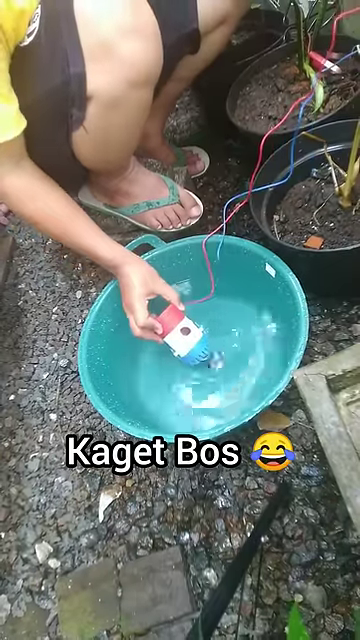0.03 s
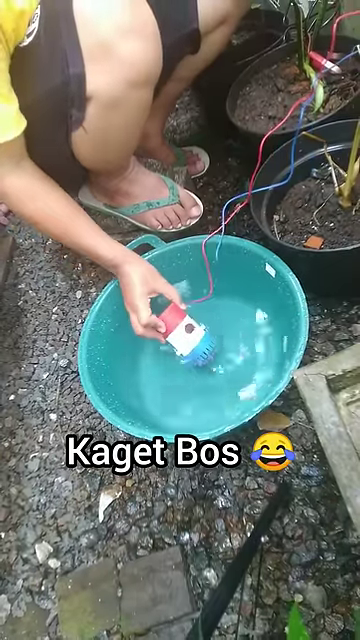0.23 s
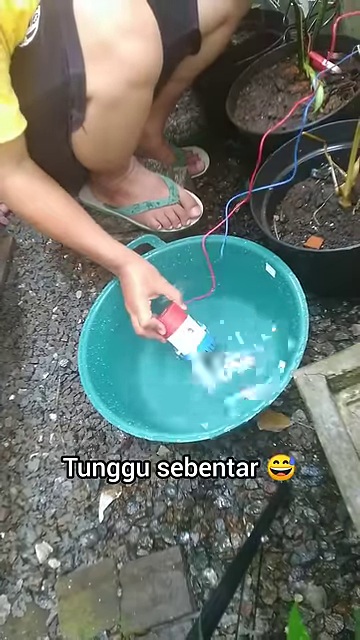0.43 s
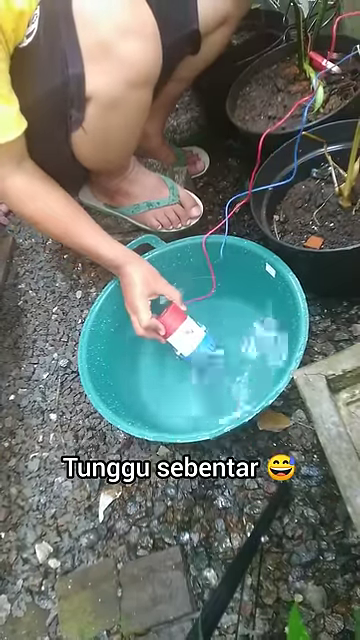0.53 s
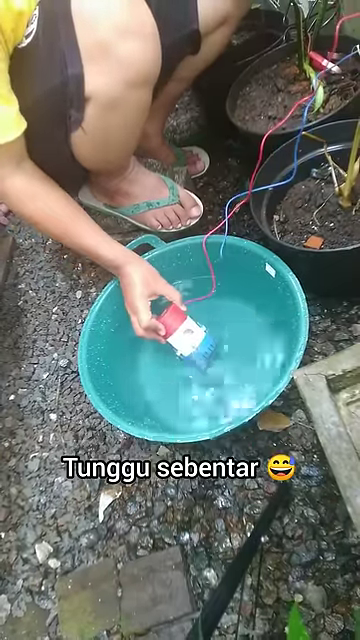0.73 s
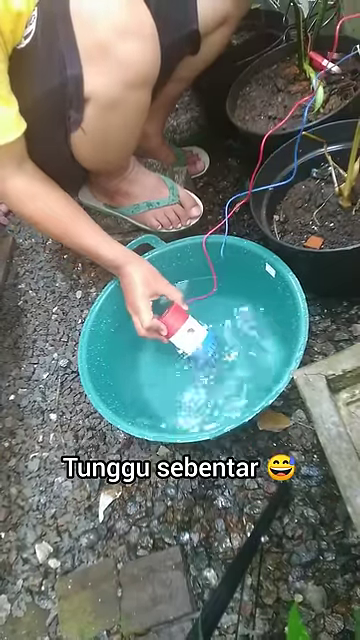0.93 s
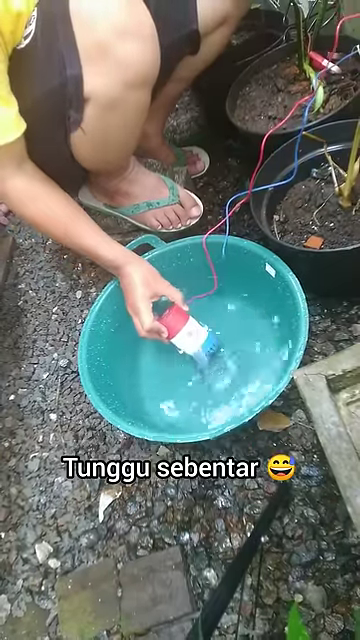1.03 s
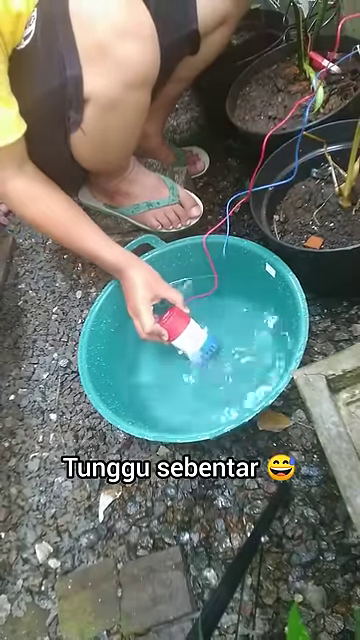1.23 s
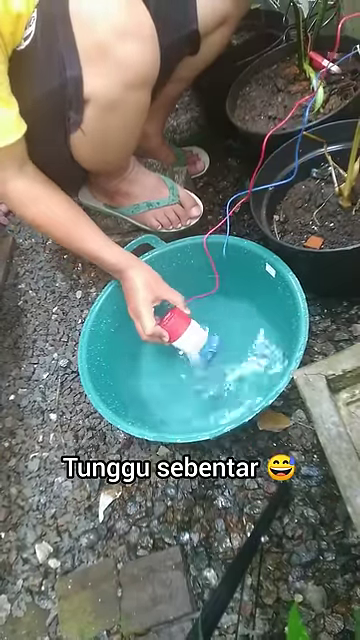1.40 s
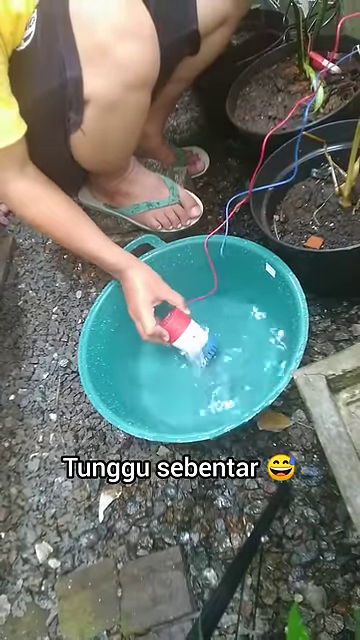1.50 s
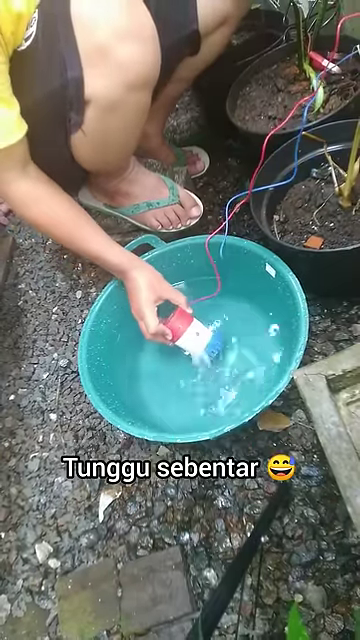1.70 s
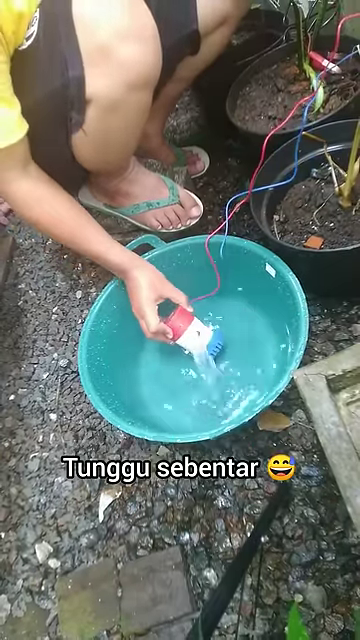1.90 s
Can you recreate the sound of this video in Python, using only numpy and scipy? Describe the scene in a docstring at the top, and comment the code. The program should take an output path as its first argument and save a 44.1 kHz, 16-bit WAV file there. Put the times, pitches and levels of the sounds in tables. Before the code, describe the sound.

Small electric pump starts with a splash, then hums and whirs in bubbling water outdoors.

```python
"""A low distant rumble and outdoor air are heard first, then a faint high tick. A small electric pump, held
in a plastic basin of water, kicks in with a loud jolt that flings water and makes the basin boom.
It runs at about 185 turns a second: harmonics of the rotation give a hum and a bright whir, while
resonating bubbles give churning and single pops. It falters briefly, catches again with a smaller jolt
and runs on."""
import sys
import numpy as np
from scipy import signal
from scipy.fft import rfft, irfft
from scipy.io import wavfile

SR = 44100
rng = np.random.default_rng(int(sys.argv[2]) if len(sys.argv) > 2 else 0)


def int16_out(signal):
    """Quantize to a 16-bit WAV file."""
    q = np.round(np.clip(np.atleast_2d(signal).T, -1, 1) * 32767)
    wavfile.write(sys.argv[1], SR, q.astype(np.int16))


N = 85995
T = np.arange(N) / SR

# Spectral density shapes of the sources: frequency_hz, relative_db
RUMBLE_SPECTRUM = [(25, -19), (40, -10), (60, 4), (85, 2.5), (120, -2), (170, -7), (230, -12), (330, -39)]
AIR_SPECTRUM = [(250, -7), (350, -7.5), (550, -11), (900, -17), (3000, -23), (5000, -28), (7800, -36),
                (11000, -29), (16000, -28)]
TICK_SPECTRUM = [(2800, -9), (3200, -4), (3800, -12), (5000, -8), (5550, 4.5), (6200, -4), (7000, -22),
                 (10000, -19)]
WHIR_SPECTRUM = [(880, -56), (1500, -14), (1790, -6.5), (1940, -6), (2190, 1), (2690, -6.5), (2910, -5),
                 (3310, -6), (3960, -3), (4370, -7), (4870, 1), (5120, -5.5), (7690, -19), (10000, -2.5),
                 (11700, 0), (13300, -2.5), (16000, -13.5)]
SIZZLE_SPECTRUM = [(10500, -22), (11400, 10), (11850, 9), (12350, -7), (13400, 2), (14500, 4), (15700, -23)]
CHURN_SPECTRUM = [(120, -44), (200, -8), (312, -3.5), (355, -7), (465, -7.5), (715, -5.5), (839, 2.5),
                  (1210, -4), (1510, -8), (2220, -7.5), (4760, -9.5), (7800, -17), (9000, -55),
                  (11700, -47), (19800, -120)]
CRACK_SPECTRUM = [(3530, -13), (6000, -12), (8200, -20.5), (12000, -10), (12500, -4.5), (13900, -8),
                  (15500, -17), (16000, -30)]
SPLASH_SPECTRUM = [(290, -43), (500, -16), (568, -42), (645, -17), (708, -6), (814, -11.5), (883, -22),
                   (1080, -3), (1140, -13), (1220, -4), (1560, -11.5), (1850, -12), (2450, -1.5),
                   (2660, -4), (3680, -11), (4030, -20), (4480, -9), (6800, -27), (8000, -29), (10400, -28),
                   (17600, -120)]
BOOM_SPECTRUM = [(88, -52), (150, -41), (221, -10.5), (292, -27), (501, -8.5), (574, -11), (641, -7.5),
                 (716, -38), (895, -6.5), (1000, -62), (1300, -52), (2200, -120)]
# Likeness of left and right, from 0 to 1: frequency_hz, coherence
COHERENCE = [(100, 0.9), (500, 0.7), (1200, 0.11), (3000, 0.04), (6000, 0.09), (10000, 0.06), (15000, 0.37)]
# Rotation of the motor: time_s, speed_turns_per_s
ROTOR_SPEED = [(0.24, 60), (0.27, 140), (0.292, 169), (0.32, 174.5), (0.36, 179), (0.42, 183.5),
               (0.48, 184.7), (0.54, 185.1), (0.62, 184.2), (0.68, 184), (0.76, 185.9), (0.82, 186.3),
               (0.94, 186.3), (1.0, 185.7), (1.12, 185.3), (1.21, 184), (1.33, 184.4), (1.42, 179),
               (1.505, 170), (1.56, 178), (1.63, 184.3), (1.75, 184.3), (1.8, 183.6), (1.9, 183.9),
               (1.95, 182.5)]
# The two strong harmonics of the hum: time_s, third_order_db, fourth_order_db
STRONG_HUM = [(0.275, -46.5, -56), (0.3, -33, -68), (0.33, -40.5, -75), (0.355, -58, -60),
              (0.38, -67, -53.5), (0.48, -61.5, -53), (0.65, -63.5, -50.5), (0.9, -66, -50.5),
              (1.1, -60, -49.5), (1.32, -71, -53.5), (1.42, -63, -63), (1.52, -60, -69), (1.62, -56, -60),
              (1.78, -58.5, -54), (1.87, -53, -59), (1.95, -53, -58)]
# The weaker harmonics of the hum: order, level_db
WEAK_HUM = [(1, -57), (2, -68.5), (5, -66.5), (6, -66.5), (7, -67.5)]
# Envelope of the whir: time_s, level_db
WHIR_ENVELOPE = [(0.35, -36.5), (0.366, -42), (0.438, -41.5), (0.71, -44), (0.776, -41), (1.158, -44),
                 (1.274, -46), (1.37, -44), (1.502, -44.5), (1.51, -37), (1.612, -44.5), (1.626, -45),
                 (1.828, -48), (1.93, -46)]
# Weighting of the buzz harmonics over the whir spectrum: frequency_hz, relative_db
BUZZ_EMPHASIS = [(1500, -3.5), (5000, -0.5), (8500, 8.5), (13500, -2.5), (15500, 7)]
# Metallic resonances, shifting as the pump moves: time_s, first_hz, second_hz, third_hz, fourth_hz
WHINE_RESONANCES = [(.45, 10330, 11250, 12150, 13250), (.6, 10150, 11330, 11800, 13300),
                    (.78, 10420, 11300, 12100, 13300), (.95, 10400, 11280, 12090, 13150),
                    (1.15, 10050, 11550, 12300, 12800), (1.65, 10250, 11450, 12000, 13070)]
# Height of each of those resonances relative to the whir: gain_db
WHINE_GAINS_DB = [-14, -13.5, -12.5, -13]
# Vigour of the churning: time_s, level_db
CHURN_ENVELOPE = [(0.3, -56), (0.4, -49.5), (0.5, -51.5), (0.62, -56), (0.9, -55), (1.1, -51), (1.3, -51.5),
                  (1.38, -47.5), (1.45, -43), (1.495, -56.5), (1.54, -51.5), (1.63, -55), (1.75, -53.5),
                  (1.87, -51.5), (1.95, -52.5)]
# Jolts as the motor catches: start_s, crack_db, splash_db, boom_db
MOTOR_JOLTS = [(0.2401, -32, -29, -63), (0.2534, -26, -25, -30), (0.7645, -34, -39, -70),
               (1.509, -36.5, -35.5, -50)]
# Decay of each jolt's splash: t60_s
SPLASH_DECAYS_S = [0.079, 0.23, 0.025, 0.1]
# Modes of the pump body and basin: pitch_hz, relative_db, t60_s
BODY_MODES = [(863, 10, 0.15), (1314, -3, 0.16), (1346, -1, 0.13), (1760, -12, 0.66), (2123, 2.5, 0.24),
              (3525, -6, 0.092), (3756, 1, .18), (4043, 4, 0.1)]
# Air pockets that pop: start_s, pitch_hz, level_db, t60_s, glide_octaves_per_s
AIR_POCKETS = [(0.258, 4060, -18.5, 0.014, 10), (0.2587, 1800, -15.5, 0.016, 8),
               (0.2589, 3860, -16.5, 0.028, 7), (0.2631, 1390, -20, 0.018, -6),
               (0.275, 1080, -20.5, 0.012, -14), (0.2801, 1207, -21.5, 0.025, -6),
               (0.2564, 2760, -20, 0.018, 2), (0.268, 2650, -31, 0.049, 5.5), (0.484, 555, -45, 0.049, 8),
               (0.7635, 953, -36, 0.017, -9), (0.823, 1360, -41, 0.028, 27), (0.932, 2860, -38, 0.023, 7),
               (1.007, 566, -46.5, 0.046, 1), (1.04, 1070, -31, 0.0092, 4), (1.044, 873, -39, 0.077, 5),
               (1.041, 3780, -41, 0.016, 10), (1.182, 1370, -44, .03, -5), (1.198, 2440, -43.5, 0.043, -3),
               (1.228, 3150, -39, 0.024, 7), (1.244, 620, -48, 0.068, -15), (1.388, 844, -47.5, 0.13, -1.5),
               (1.426, 1124, -42, 0.088, 6.5), (1.455, 905, -44.5, 0.061, 2), (1.511, 4940, -38, 0.036, -4),
               (1.512, 420, -34, 0.036, 8), (1.556, 1200, -40, 0.052, 5), (1.56, 1020, -42.5, 0.072, -4),
               (1.561, 1930, -41.5, 0.055, 1), (1.662, 3240, -45, 0.041, -7),
               (1.699, 1020, -35, 0.071, 34.5), (1.767, 1860, -45, 0.081, 1.5), (1.857, 855, -40, 0.041, 8),
               (1.862, 576, -44, 0.072, 0.5), (1.905, 546, -48.5, 0.1, 6.5), (1.919, 2500, -43.5, 0.039, 7)]

START_S, FADE_IN_S = 0.236, 0.015
PUMP_PAN_DB, WHINE_PAN_DB, WATER_PAN_DB = 0.5, 0.8, 1


def from_db(db):
    """Amplitude grows tenfold for every 20 decibels."""
    return 10 ** (np.asarray(db) / 20)


def rms_one(x):
    """Dividing by the root mean square gives unit power."""
    return x / np.sqrt(np.mean(x ** 2) + 1e-20)


def in_time(rows):
    """Linear interpolation gives each column of a curve at every sample."""
    times, *columns = np.transpose(rows)
    return [np.interp(T, times, column) for column in columns]


def at_hz(points, hz):
    """Interpolation on a logarithmic frequency axis reads a table."""
    frequencies, values = np.transpose(points)
    return np.interp(np.log(hz + 1e-9), np.log(frequencies), values)


def colour(points, hz):
    """Band-pass gain: it follows a spectrum and falls 24 dB an octave beyond its ends."""
    hz = hz + 1e-9
    skirt = np.minimum(1, np.minimum(hz / points[0][0], points[-1][0] / hz)) ** 4
    return from_db(at_hz(points, hz)) * skirt


def pan(db):
    """A level difference between the ears shifts a source to one side."""
    return from_db(np.array([[db], [-db]]))


def drift(rate_hz):
    """Low-pass filtered noise gives a smooth random fluctuation of unit spread."""
    step = 40   # samples per random value
    pole = np.exp(-2 * np.pi * step * rate_hz / SR)
    white = rng.standard_normal(N // step + 2002)
    slow = signal.lfilter([1], [1, -2 * pole, pole * pole], white)[2000:]
    return np.interp(np.arange(N) / step, np.arange(len(slow)), rms_one(slow))


def spread(mid, side, hz):
    """Sum and difference of two unrelated signals give partly coherent left and right."""
    alike = np.clip(at_hz(COHERENCE, hz), 0, 1)
    return np.sqrt((1 + alike) / 2) * mid + np.sqrt((1 - alike) / 2) * side * np.array([[1], [-1]])


def noise(spectrum):
    """Spectral shaping turns white noise into coloured stereo noise of unit power."""
    hz = np.fft.rfftfreq(N, 1 / SR)
    mid, side = rfft(rng.standard_normal((2, N)))
    return rms_one(irfft(spread(mid, side, hz) * colour(spectrum, hz), N))


def ring(clicks, hz, t60):
    """A damped resonator answers each impulse with a decaying sine."""
    radius = np.exp(-np.log(1000) / (t60 * SR))
    angle = 2 * np.pi * hz / SR
    return signal.lfilter([0, np.sin(angle)], [1, -2 * radius * np.cos(angle), radius ** 2], clicks + 1e-18)


def swell(start_s, rise_s, t60):
    """Exponential decay, 60 dB in t60 seconds, follows a linear attack."""
    attack = np.clip((T - start_s) / rise_s, 0, 1)
    return attack * np.exp(-np.log(1000) * np.maximum(T - start_s - rise_s, 0) / t60)


def outdoors():
    """Stationary noise in two broad bands is heard as distant rumble and open air."""
    return (from_db(-51) * noise(RUMBLE_SPECTRUM) + from_db(-63.5) * noise(AIR_SPECTRUM)) * pan(2)


def tick():
    """A fast-decaying transient of treble noise is heard as a faint tick."""
    return from_db(-56.5) * swell(0.049, rise_s=0.00093, t60=0.11) * noise(TICK_SPECTRUM)


def harmonic(angle, order, waver_db, rate_hz):
    """A harmonic is phase-locked to a multiple of the rotor angle; its level wavers at random."""
    amplitude = np.sqrt(2) * from_db(waver_db * np.tanh(drift(rate_hz)))
    return amplitude * np.sin(round(order) * angle + rng.uniform(0, 2 * np.pi))


def hum(angle):
    """The lowest seven harmonics of the rotation add up to a hum."""
    third_db, fourth_db = in_time(STRONG_HUM)
    tones = [(3, third_db), (4, fourth_db)] + list(WEAK_HUM)
    return sum(from_db(db) * harmonic(angle, k, waver_db=1.3 if k == 4 else 4, rate_hz=10)
               for k, db in tones)


def whir(angle, speed):
    """Periodic excitation: brushes and impeller rasp once a turn, giving buzz, whine and pulsing hiss."""
    usual_speed, centres = np.median(speed), in_time(WHINE_RESONANCES)
    orders, whine_above_hz, width_hz = range(8, 86), 9600, 150

    def partial(order, waver_db, rate_hz):
        mid, side = (harmonic(angle, order, waver_db, rate_hz) for _ in range(2))
        return spread(mid, side, order * usual_speed)

    def buzz_gain(hz):
        return colour(WHIR_SPECTRUM, hz) * from_db(at_hz(BUZZ_EMPHASIS, hz))

    def resonance(hz):
        return sum(from_db(db) * np.exp(-0.5 * ((hz - centre) / width_hz) ** 2)
                   for centre, db in zip(centres, WHINE_GAINS_DB))

    buzz = sum(buzz_gain(k * usual_speed) * partial(k, waver_db=6, rate_hz=3) for k in orders)
    whine = sum(resonance(k * speed) * partial(k, waver_db=3.5, rate_hz=4)
                for k in orders if k * usual_speed > whine_above_hz)
    tones = from_db(-6.5) * rms_one(buzz) + whine * pan(WHINE_PAN_DB)
    loss_db = np.clip(2.5 * (183 - speed), 0, 14)   # the tones are clear only at full speed
    hiss = noise(WHIR_SPECTRUM) * (1 + 0.18 * (np.cos(angle) + np.cos(2 * angle)))
    return from_db(in_time(WHIR_ENVELOPE)[0]) * (from_db(-loss_db) * tones + from_db(-6) * hiss)


def motor():
    """Rotation rate sets the fundamental of hum and whir; the spinning impeller adds a steady sizzle."""
    speed, = in_time(ROTOR_SPEED)
    jitter = 1 + 0.00023 * drift(rate_hz=24)
    angle = 2 * np.pi * np.cumsum(speed * jitter) / SR
    rotation = hum(angle) * pan(1.7) + whir(angle, speed) * pan(PUMP_PAN_DB)
    sizzle = from_db(-56) * noise(SIZZLE_SPECTRUM) * pan(WHINE_PAN_DB)
    return rotation + sizzle


def churn():
    """Bubble resonance: many small bubbles ring at random over a soft wash of moving water."""
    bubbles_per_s, ring_cycles = 900, 32
    strengths = from_db(3.5 * np.minimum(rng.exponential(1, N), 4)) * rng.choice([-1, 1], N)
    clicks = strengths * (rng.random(N) < bubbles_per_s / SR)
    pitches_hz = np.geomspace(380, 5200, 36)
    pitch_index = rng.integers(0, len(pitches_hz), N)
    fizz = sum(colour(CHURN_SPECTRUM, hz) * hz * ring(clicks * (pitch_index == k), hz, ring_cycles / hz)
               for k, hz in enumerate(pitches_hz))
    water = from_db(-5.5) * rms_one(reflections(fizz)) + from_db(-1) * noise(CHURN_SPECTRUM)
    return from_db(in_time(CHURN_ENVELOPE)[0]) * water * pan(WATER_PAN_DB)


def reflections(direct):
    """Scattering from basin, ground and walls adds a brief diffuse tail to the direct sound."""
    mid, side = rfft(rng.standard_normal((2, N)))
    diffuse = irfft(spread(mid, side, np.fft.rfftfreq(N, 1 / SR)), N)
    response = (diffuse * swell(0.003, rise_s=0.00055, t60=0.2))[:, :SR // 2]
    response /= np.sqrt(np.sum(response ** 2, axis=1, keepdims=True))
    return direct + from_db(-4) * signal.fftconvolve(direct[None], response, axes=1)[:, :N]


def jolts():
    """Impulsive excitation: each jolt cracks, throws water at the ringing body and makes the basin boom."""
    crack = splash = boom = 0
    kicks = np.zeros(N)
    for (start_s, crack_db, splash_db, boom_db), t60 in zip(MOTOR_JOLTS, SPLASH_DECAYS_S):
        snap = swell(start_s, rise_s=0.00057, t60=0.013)
        tail = from_db(-5.5) * swell(start_s, rise_s=0.0032, t60=t60)
        crack += from_db(crack_db) * (snap + tail)
        splash += from_db(splash_db) * swell(start_s, rise_s=0.0018, t60=t60)
        boom += from_db(boom_db) * swell(start_s, rise_s=0.019, t60=0.26)
        kicks[int(start_s * SR)] = from_db(splash_db - 20)
    body = sum((-1) ** k * from_db(db) * ring(kicks, hz, t60) for k, (hz, db, t60) in enumerate(BODY_MODES))
    bursts = crack * noise(CRACK_SPECTRUM) + splash * noise(SPLASH_SPECTRUM) + boom * noise(BOOM_SPECTRUM)
    return (bursts + reflections(body)) * pan(PUMP_PAN_DB)


def pops():
    """Large air pockets ring unsteadily as damped oscillators, some rising in pitch as they surface."""
    ringing = 0
    for start_s, hz, db, t60, glide in AIR_POCKETS:
        age = np.clip(T - start_s, 0, None)
        wobble_octaves = 0.06 * drift(rate_hz=110)
        pitch_hz = hz * 2 ** (glide * np.minimum(age, t60 / 2) + wobble_octaves)
        flutter_db = 4 * np.tanh(drift(rate_hz=110))
        envelope = from_db(db + flutter_db) * swell(start_s, rise_s=0.041 * t60, t60=t60)
        ringing += envelope * np.sin(2 * np.pi * np.cumsum(pitch_hz * (age > 0)) / SR)
    return reflections(ringing) * pan(WATER_PAN_DB)


def scene():
    """Superposition: the pump and its water add to the outdoor background."""
    running = np.clip((T - START_S) / FADE_IN_S, 0, 1)
    return outdoors() + running * (motor() + churn()) + jolts() + pops() + tick()


def record(dry):
    """An elliptic low-pass filter cuts the top treble steeply."""
    return signal.sosfilt(signal.ellip(10, 0.2, 80, 15750, fs=SR, output="sos"), dry)


dry = scene()
out = record(dry)
int16_out(out)
```